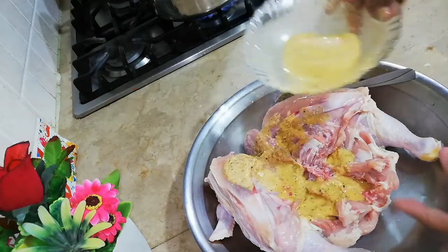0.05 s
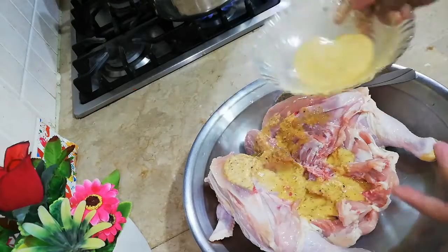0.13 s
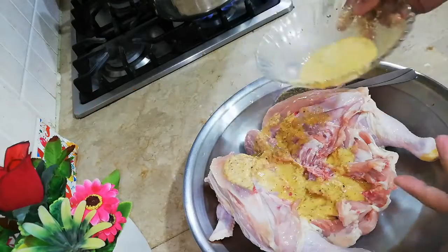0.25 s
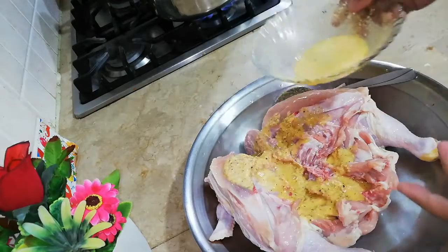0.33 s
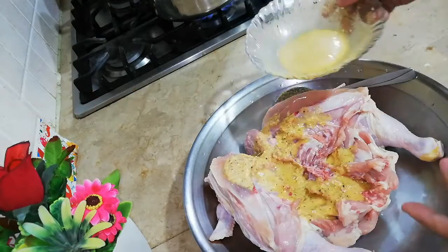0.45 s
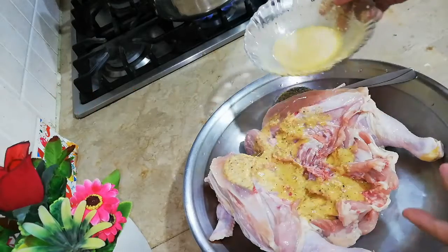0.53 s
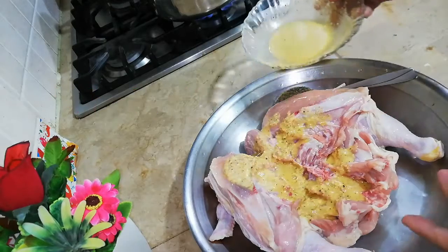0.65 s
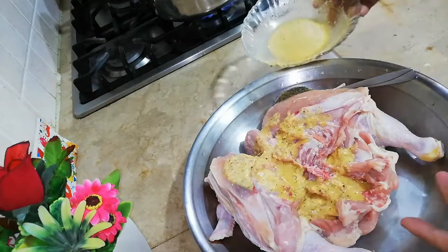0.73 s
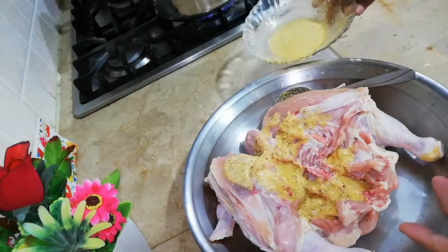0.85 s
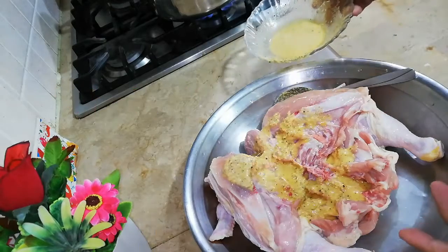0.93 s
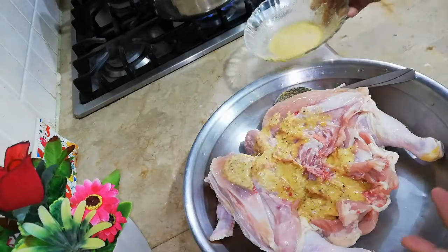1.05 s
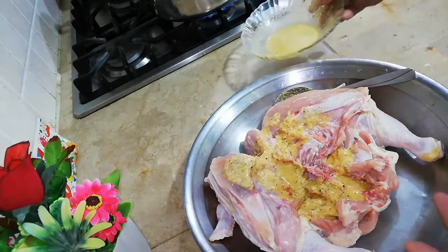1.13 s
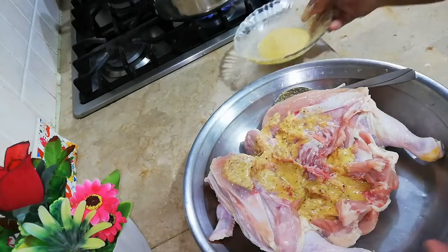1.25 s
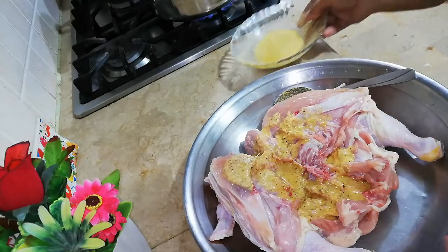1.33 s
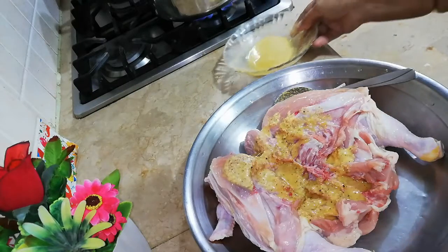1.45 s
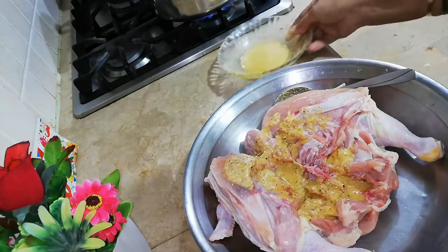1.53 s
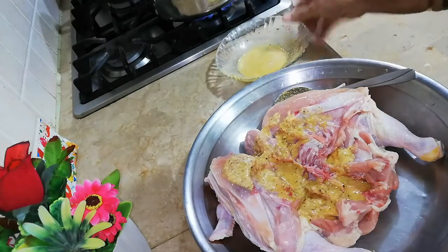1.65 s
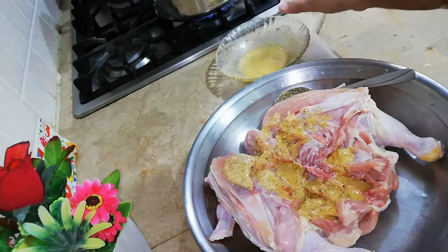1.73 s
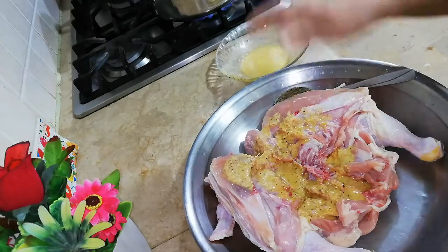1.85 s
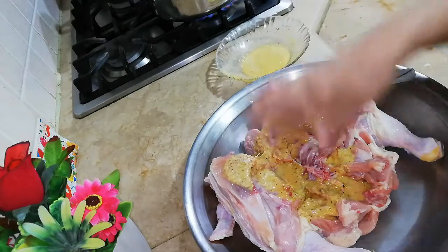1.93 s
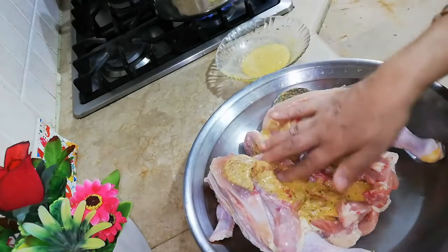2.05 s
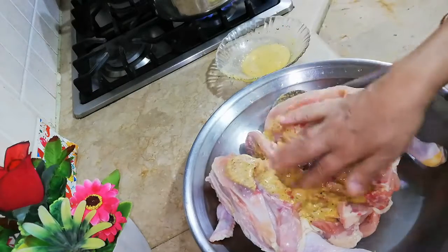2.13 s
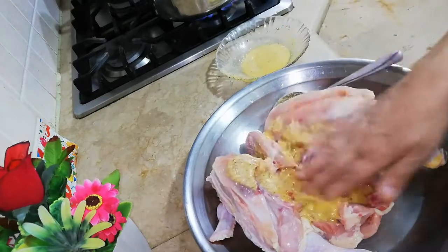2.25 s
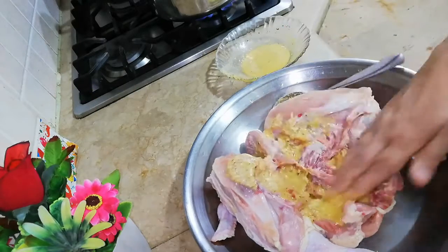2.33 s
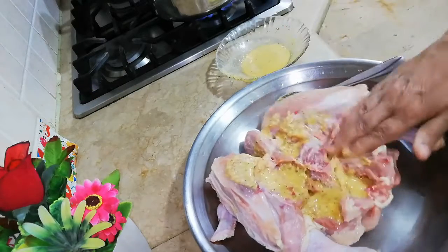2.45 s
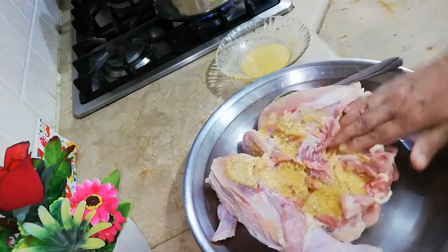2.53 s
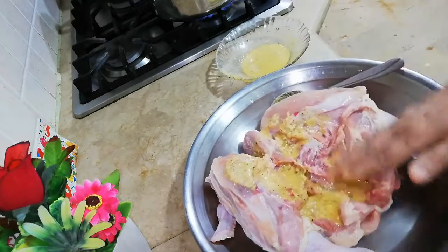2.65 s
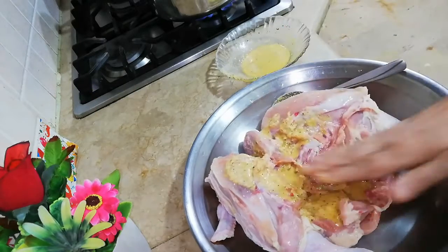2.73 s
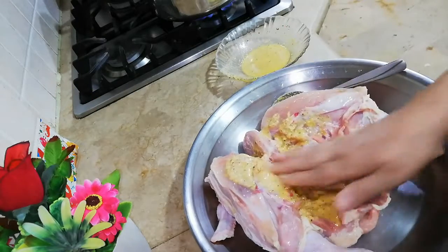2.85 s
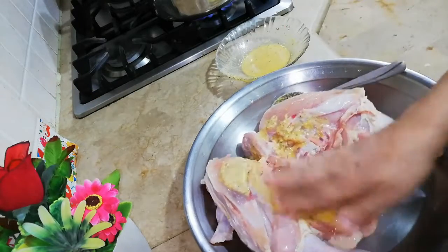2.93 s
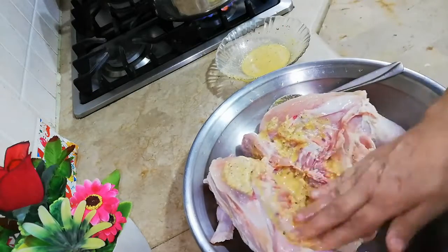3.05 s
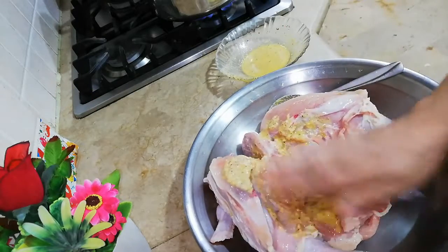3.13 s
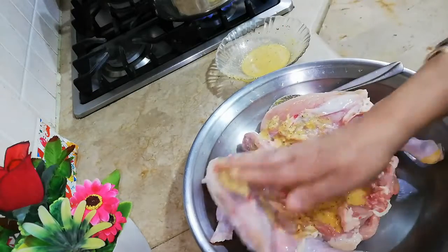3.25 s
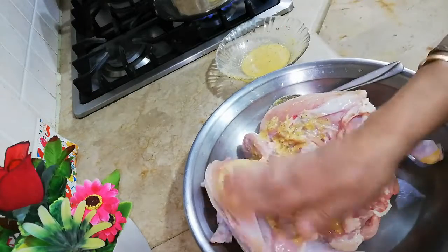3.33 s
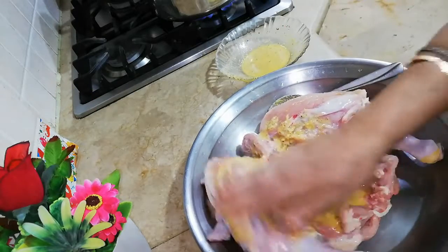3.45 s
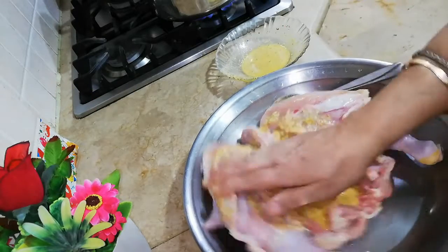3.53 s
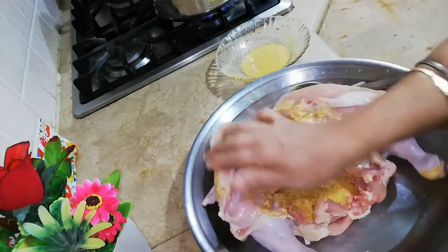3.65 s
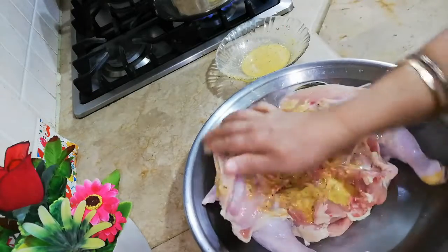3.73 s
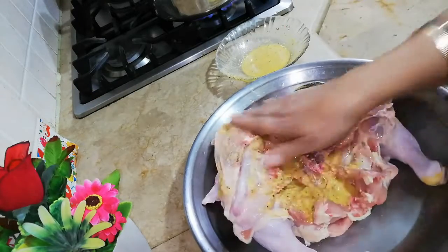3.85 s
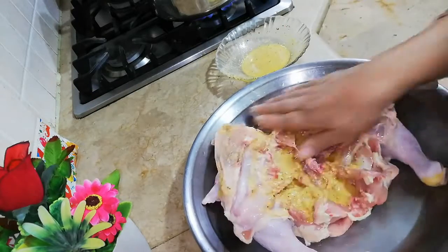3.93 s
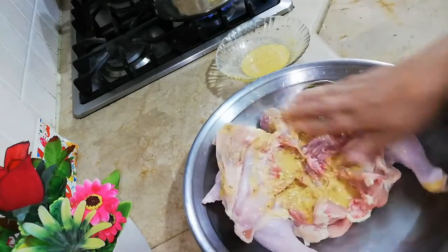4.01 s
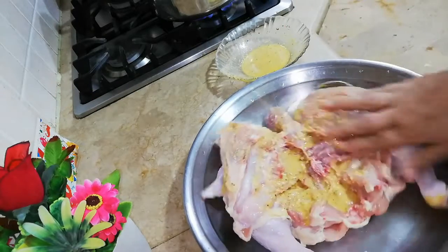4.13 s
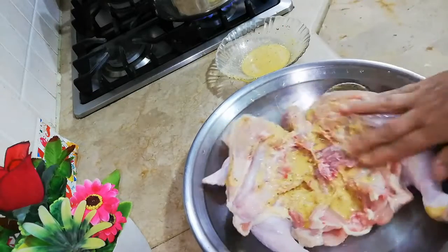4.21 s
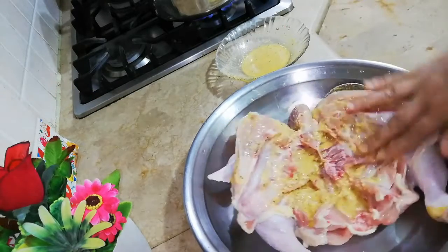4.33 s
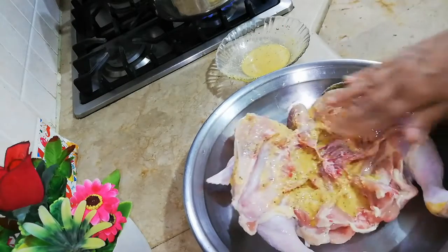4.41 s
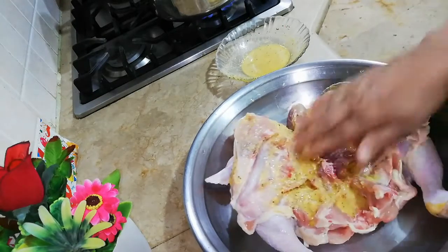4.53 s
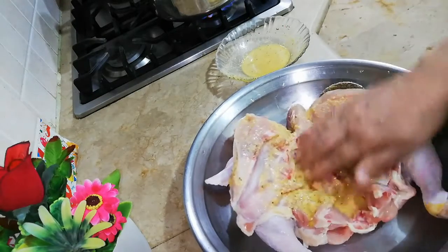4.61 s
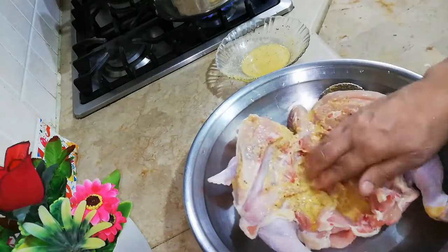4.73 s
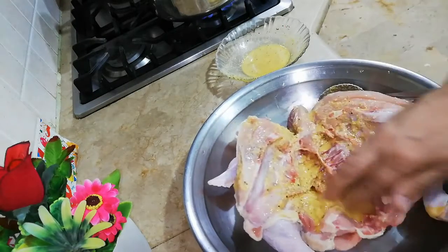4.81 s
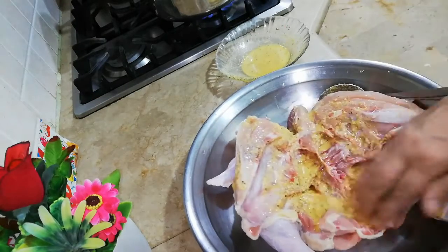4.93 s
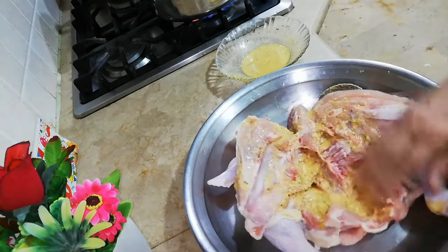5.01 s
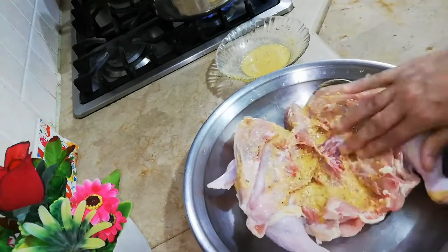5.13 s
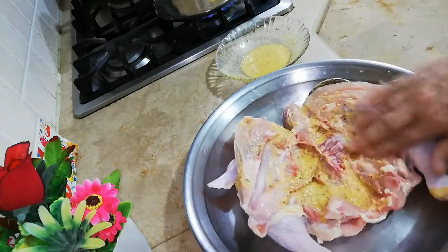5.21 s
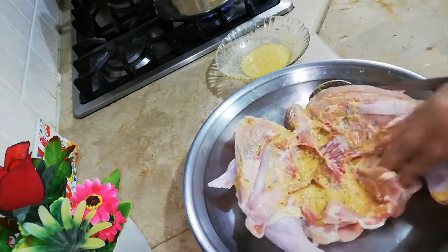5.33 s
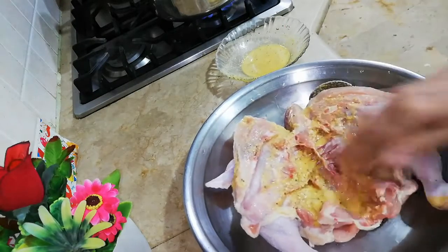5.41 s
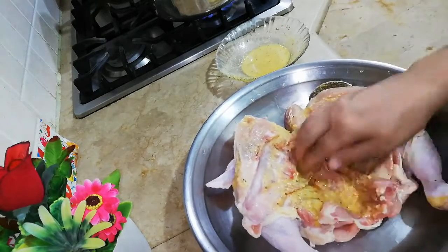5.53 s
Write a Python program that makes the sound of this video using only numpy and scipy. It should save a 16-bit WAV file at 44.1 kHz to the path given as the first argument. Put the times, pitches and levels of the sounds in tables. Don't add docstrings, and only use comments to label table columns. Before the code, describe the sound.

Over a faint fridge hum, glass clunks three times on stone, a spoon clinks, and uneven metallic tray scrapes follow with small wet ticks.

```python
import sys
import numpy as np
from scipy import signal
from scipy.fft import rfft, irfft, next_fast_len
from scipy.io import wavfile
from scipy.ndimage import uniform_filter1d

SR = 44100
rng = np.random.default_rng(int(sys.argv[2]) if len(sys.argv) > 2 else 0)


def attenuation_scalar(level_db):
    decades = np.asarray(level_db, float) / 20
    return 10 ** decades


def inscribe(sig):
    pcm = np.round(np.clip(np.atleast_2d(sig).T, -1, 1) * 32767)
    wavfile.write(sys.argv[1], SR, pcm.astype(np.int16))


N = 245637
T = np.arange(N) / SR

# frequency in Hz, level in dB.
HUM_LINES = [(48.7, -54), (58, -65.5), (99.6, -58.5), (146, -66.5), (289, -69)]
# frequency in Hz, density in dB per Hz.
AIR_SPECTRUM = [(12, -18), (20, -3), (60, -6.5), (168, -7), (234, -18), (293, -16), (642, -27), (1030, -23),
                (1810, -30.5), (1960, -22.5), (2320, -27.5), (3740, -30), (5850, -34), (10800, -33.5),
                (16000, -49.5)]
# frequency in Hz, width in Hz, height above the air in dB.
WHINES = [(304, 10, 4), (1037, 26, 4.5), (1634, 110, 6), (1950, 150, 3.5), (2690, 30, 7.5), (3830, 150, 7),
          (4400, 50, 6), (5700, 190, 3.5), (7050.3, 350, 7), (8880, 508.5, 5), (11000, 220, 8.5),
          (15200, 250, 17)]
# frequency in Hz, t60 in s.
KITCHEN_DECAY = [(100, 0.84), (400, 0.66), (1200, 0.59), (3000, 0.62), (8000, 0.38), (16000, 0.48)]
# start in seconds, peak in dB, centre in Hz, left minus right in dB.
WET_TICKS = [(1.9444, -52, 3880, -7), (2.0639, -46, 5000, -3), (2.6319, -35.5, 2410, 3),
             (2.9986, -29.5, 4930, 7), (3.5224, -46, 4900, 3.5), (3.5513, -32.5, 4150, 2),
             (4.6463, -43, 4830, -4), (4.6604, -53, 3210, 3), (4.7885, -43.5, 5500, -4),
             (5.0809, -43, 4500, 0.0), (5.1064, -30, 4530, 3), (5.3447, -35.5, 3800, -10),
             (3.573, -42, 1300, 0.0)]
# start in seconds, peak in dB, centre in Hz, left minus right in dB.
PASTE_SNAPS = [(2.0526, -42.5, 9000, -3), (2.0797, -36, 8000, 1), (2.5608, -45, 7000, 14.5),
               (2.6005, -45, 10500, 0), (3.292, -41.5, 7100, 2), (4.577, -42, 7500, -2),
               (4.842, -43, 10300, -6), (4.9613, -51.5, 9900, -8), (5.1209, -27, 8700, -13.5)]
# start in seconds, level in dB, pitch in Hz, t60 in s, length in s.
SETTLE_BUMP = (5.485, -56, 630, 0.025, .04)
# start in seconds, peak in dB.
SPOON_CLINKS = [
    (2.197, -49),
    (2.222, -30),
    (2.2227, -25.5),
    (2.2254, -24),
    (2.2265, -31.5),
    (2.2327, -35.5),
    (2.253, -41),
]
# frequency in Hz, level in dB, t60 in s.
SPOON_MODES = [(1524, -26, 0.027), (2280, -9, 0.038), (3200, -3.5, 0.12), (3540, -20, .06),
               (4260, 0.5, 0.044), (5060, -10, .08), (6970, -8, 0.042), (7500, -12, 0.031),
               (8000, -4, 0.036), (9170, -15, 0.047), (10000, -30, 0.054), (11870, -16, .04)]
# start in seconds, peak in dB, crack in dB, chip pitch in Hz, rim level in dB.
BOWL_KNOCKS = [
    (1.459, -7, -18.5, 5350, -35),
    (1.53, -8.5, -19.5, 5100, -37),
    (1.625, -10.5, -15.5, 4460, -15),
]
# frequency in Hz, level in dB, t60 in s.
BOWL_MODES = [(117, -2, 0.11), (173.6, 5.5, 0.22), (326, 0, 0.081), (850, -7, 0.026), (1240, 5, 0.03),
              (1366, -5, 0.014), (1510, 10.5, 0.017), (1642.7, -9, 0.017), (2030, -2, .012),
              (2416, 3, 0.027), (2434.3, 2.5, 0.014), (3070, -8, 0.0164)]
# frequency in Hz, density in dB per Hz.
CLATTER_SPECTRUM = [(59, -33), (100, -3.5), (360, -7.5), (523, -12), (1500, 3), (2320, -7), (4050, -22),
                    (5190, -26.5), (9850, -24), (14000, -39)]
# frequency in Hz, width in Hz, level in dB.
TRAY_MODES = [(1120, 59, -11), (1254, 52, 10), (1376.5, 32, 11), (1552, 27, 3.5), (1700, 27, -8),
              (1800, 67, 11), (1906, 51, 9.5), (2140, 31, 4.5), (2410, 44.76, 2), (3177, 46, 2),
              (3390, 40, -1.5), (3580, 33, -2), (3756, 56, -3), (4010, 53, -5), (4310, 30, -2),
              (4520, 60, -2), (4798, 57, -1.5), (4990, 33, -1), (5800, 360, -7), (6400, 180, -4),
              (7270, 230, -3), (6900, 1000, 4), (8160, 160, 4), (8800, 180, -0.5), (9400, 68, 2),
              (10530, 100, 11.5), (11000, 280, -17)]
# frequency in Hz, t60 in s.
TRAY_DRONE = (870, 0.06)
# frequency in Hz, density in dB per Hz.
SCRAPE_SPECTRUM = [(180, -44), (300, 11), (713, -2), (870, -4), (1060, -33), (1260, 10), (1660, 11.5),
                   (1870, -8), (2610, -5), (3130, -15), (4590, -5.5), (6000, -7), (8000, 3), (11100, -2.5),
                   (16000, -20)]
# frequency in Hz, width in Hz, depth in dB.
TRAY_GAPS = [(1120, 160, -2), (2870, 200, -5.5), (5450, 300, -7), (5950, 300, -4), (10448, 680, -10)]
# peak time in seconds, scrape in dB, rise over 20 dB in s, fall over 20 dB in s,
# weight on the tray in dB.
HAND_SLIPS = [(2.231, -37.5, .006, .09, -8.5), (2.4, -43, 0.25, 0.1, -6), (2.532, -44, 0.05, 0.08, -3),
              (2.682, -44.5, -0.07, 0.08, -1), (2.726, -42.5, 0.21, 0.03, -5), (2.978, -50, .035, 0.05, -4),
              (3.006, -44.5, .05, 0.12, -11), (3.076, -41.5, 0.03, .05, -5.5),
              (3.576, -45, -0.08, 0.06, -3), (3.635, -36, 0.09, 0.19, -8), (3.75, -40, 0.21, 0.04, -5.5),
              (3.998, -45, 0.04, .5, -5.5), (4.15, -41, .1, 0.26, -4.5),
              (4.295, -38.5, -0.01, 0.0672, -3.5), (4.332, -35.5, 0.036, .035, -10),
              (4.382, -35, .028, 0.1335, -3), (4.426, -41, 0.19, 0, -6), (4.488, -61, 7, 0.35, -18.5),
              (5.084, -42.5, 0.0429, 0.27, -5), (5.128, -46, 0.08, 0.19, -2.5), (5.262, -43, 0.16, .06, -2),
              (5.346, -47, .025, 0.04, -5), (5.385, -41.5, 0.02, 0.18, -2.5), (5.455, -46, 0.13, 0.06, -3)]
# peak time in seconds, scrape in dB, weight on the tray in dB.
HAND_NUDGES = [
    (1.955, -60, -5),
    (2.074, -57, -8),
    (2.15, -65, 1),
    (2.885, -67, 5.5),
    (3.42, -51, -2.5),
    (4.687, -56, 3),
    (4.788, -58.5, -5),
]
# time in seconds, favoured low pitch in Hz, favoured high pitch in Hz,
# gloss of the slide in dB, grip on the rim in dB.
TRAY_CONTACT = [(1.95, 1800, 3900, -3.5, 8), (2.27, 1410, 4070, -8.5, -4), (2.42, 1870, 4270, -6, -5),
                (2.53, 1320, 4050, -7, -2), (2.74, 1825, 4000, -10.5, -7), (2.97, 1400, 4600, -1.5, 0),
                (3.09, 1800, 4000, -4, -7), (3.42, 1860, 3700, -8, 0), (3.56, 1400, 4400, 0, -5.5),
                (3.64, 1650, 4500, 1, -2.5), (3.79, 1740, 4540, -1.5, 2), (4.0, 1860, 4500, -5, -1),
                (4.11, 1870, 4000, -4.5, 5), (4.3, 1624, 4150, 0, -5.5), (4.39, 1410, 3900, -3, -2.5),
                (4.7, 1420, 3960, -6, 0), (5.1, 1486, 4100, -3, -5.5), (5.45, 1340, 3820, -8, 2.5)]

PORTS_M = 0.31
AIR_DB = -58.5
TICK_OCTAVES, TICK_T60_S = 0.55, 0.011
SNAP_OCTAVES, SNAP_T60_S = 0.57, 0.02
THUD_DB = -11.5
NUDGE_RISE_S, NUDGE_FALL_S = .06, 0.055
ROUNDNESS = 1.436
LOW_SPLIT_HZ, HIGH_SPLIT_HZ, LEAN_DB_PER_OCTAVE = 1530, 4270, 14.5
DRONE_LINGER, BOOM_LINGER, SCRAPE_LINGER, HISS_LINGER = 1.08, 1.006, 0.9, .85
DRONE_DB, CROWD_DB, TRAY_DB, PAN_DB = -13.5, -4.5, 3.0, -1.0
PATCHY_DB, PATCHES_PER_S = 1.5, 30
TOP_HZ = 16150


def colour(table, hz):
    rows = np.array(table)
    return np.interp(np.log(hz + 1), np.log(rows[:, 0]), rows[:, 1])


def bumps(table, hz):
    return sum(db / (1 + (2 * (hz - f) / w) ** 2) for f, w, db in table)


def shape(x, gain):
    size = next_fast_len(x.shape[-1])
    return irfft(rfft(x, size) * gain(np.fft.rfftfreq(size, 1 / SR)), size)[..., :x.shape[-1]]


def unit(x):
    return x / np.sqrt(np.mean(x ** 2))


def even(x, span_s=0.03):
    return x / np.sqrt(uniform_filter1d(np.mean(x ** 2, 0), int(span_s * SR)))


def pan(db):
    return attenuation_scalar(np.array([db, -db]) / 2)


def walk(rate_hz):
    k = int(SR / rate_hz)
    knots = N // k + 2
    return 1.26 * np.interp(T, np.arange(knots) * k / SR, rng.standard_normal(knots))


def diffuse(size):
    mid, side = rng.standard_normal((2, size))
    alike = lambda hz: np.sinc(2 * hz * PORTS_M / 343)
    side = shape(side, lambda hz: np.sqrt((1 - alike(hz)) / (1 + alike(hz))))
    return np.array([mid + side, mid - side])


def ring(x, hz, t60_s, turn_rad):
    pole = np.exp((2j * np.pi * hz - np.log(1000) / max(t60_s, .002)) / SR)
    z = signal.lfilter([1], [1, -pole], x)
    return np.array([z.imag, (z * np.exp(1j * turn_rad)).imag])


def tail(t60, length_s):
    noise = diffuse(int(length_s * SR))
    t = np.arange(noise.shape[1]) / SR
    out = 0
    for f in 60 * 2 ** np.arange(0, 8.5, .5):
        band = shape(noise, lambda hz: np.clip(1 - 2 * abs(np.log2((hz + 1) / f)), 0, 1))
        out = out + band * attenuation_scalar(-60 * t / t60(f))
    return out / np.sqrt(np.sum(out ** 2) / 2)


def through(x, response):
    return signal.fftconvolve(x[None], response, axes=1)[:, :N]


def place(out, start_s, sound):
    k, out = int(start_s * SR), out.copy()
    out[:, k:k + sound.shape[1]] += sound[:, :N - k]
    return out


def fridge():
    hum = 0
    for line_hz, db in HUM_LINES:
        phase = 2 * np.pi * np.cumsum(line_hz + 0.17 * walk(3.08)) / SR
        hum = hum + np.sqrt(2) * attenuation_scalar(db + 2.0 * walk(6.8)) * np.sin(phase)
    spectrum = lambda hz: attenuation_scalar(colour(AIR_SPECTRUM, hz) + bumps(WHINES, hz)) * hz ** 2 / (hz ** 2 + 53.55 ** 2)
    air = shape(diffuse(N), spectrum)
    level = np.std(shape(air.mean(0), lambda hz: hz > 400))
    return hum + air * attenuation_scalar(AIR_DB) / level


def ticks():
    out, t = np.zeros((2, N)), np.arange(int(.06 * SR)) / SR
    kinds = ((WET_TICKS, TICK_OCTAVES, TICK_T60_S), (PASTE_SNAPS, SNAP_OCTAVES, SNAP_T60_S))
    for rows, octaves, t60_s in kinds:
        for s, db, centre_hz, pan_db in rows:
            band = lambda hz: np.exp(-(np.log2((hz + 1) / centre_hz) / octaves) ** 2)
            snap = shape(rng.standard_normal((2, len(t))), band) * attenuation_scalar(-60 * t / max(t60_s, .002))
            out = place(out, s, attenuation_scalar(db + 8.0) * snap / abs(snap).max() * pan(pan_db)[:, None])
    return out


def settling():
    s, db, hz, t60_s, length_s = SETTLE_BUMP
    swell = np.exp(-((T - s - length_s) / length_s) ** 2)
    return attenuation_scalar(db) * even(ring(rng.standard_normal(N), hz, t60_s, 0.55)) * swell


def spoon():
    blows = np.zeros(N)
    for s, db in SPOON_CLINKS:
        blows[int(s * SR)] = attenuation_scalar(db)
    modes = 0
    for hz, db, t60_s in SPOON_MODES:
        modes = modes + attenuation_scalar(db + 7.5) * ring(blows, hz, min(t60_s, .1), rng.uniform(-np.pi, np.pi))
    spray = through(blows, tail(lambda hz: .1, 0.2))
    rim = shape(spray, lambda hz: attenuation_scalar(colour(SCRAPE_SPECTRUM, hz)) * hz ** 2 / (hz ** 2 + 710.0 ** 2))
    return modes + attenuation_scalar(20.5) * rim


def bowl():
    out, sent = np.zeros((2, N)), np.zeros((1, N))
    t = np.arange(int(.3 * SR)) / SR
    lag_s = 0.000803
    click = 1. * (np.arange(len(t)) == SR // 10)
    pushes = ((.0001, 0.411), (.0011, 1.), (.0034, .4))  # (s, size)
    push = sum(size * np.exp(-((t - at) / .00008) ** 2) for at, size in pushes)
    for s, db, crack_db, chip_hz, rim_db in BOWL_KNOCKS:
        body = 0
        for hz, mode_db, t60_s in BOWL_MODES:
            share_db = mode_db + 2.0 * rng.standard_normal() + THUD_DB * (hz < 500)
            turn_rad = 2 * np.pi * hz * lag_s * min(hz / 980.0, 1)
            mode_hz = hz * (1 + 0.042 * rng.standard_normal())
            body = body + attenuation_scalar(share_db) * ring(rng.choice((-1, 1)) * push, mode_hz, t60_s, turn_rad)
        out = place(out, s, attenuation_scalar(db) * body / abs(body.mean(0)).max())

        crack = rng.standard_normal(len(t)) * np.exp(-abs(t - .001) / 0.00049)
        chip = ring(crack, chip_hz, 0.015, 1.74)
        out = place(out, s, attenuation_scalar(db + crack_db + 4.0) * chip / abs(chip).max())

        grains = shape(diffuse(len(t)), lambda hz: hz / (hz + 2400.0) / (1 + (hz / 7800.0) ** 2))
        out = place(out, s, attenuation_scalar(db + crack_db + 6) * grains * np.exp(-t / 0.0033))

        rim = [(8350, 900, rim_db + 24), (chip_hz, 500, 6), (170, 30, 6), (345, 40, 6)]
        clatter = shape(click, lambda hz: attenuation_scalar(colour(CLATTER_SPECTRUM, hz) + bumps(rim, hz)))
        sent = place(sent, s - .099, attenuation_scalar(db) * clatter[None])
    return shape(out, lambda hz: 1 - 1 / (1 + (hz / 180.0) ** 6)), sent[0]


def slips(weight, linger):
    nudges = [(s, db, NUDGE_RISE_S, NUDGE_FALL_S, low_db) for s, db, low_db in HAND_NUDGES]
    power = np.full(N, 1e-18)
    for s, db, rise_s, fall_s, low_db in list(HAND_SLIPS) + nudges:
        near = slice(int((s - .5) * SR), int((s + 1) * SR))
        t = T[near]
        away = np.where(t < s, (s - t) / max(rise_s, .005), (t - s) / max(fall_s, .005)) / linger
        power[near] += attenuation_scalar(db + weight * low_db - 20 * away ** ROUNDNESS) ** 2
    return np.sqrt(power)


def patchy():
    return attenuation_scalar(PATCHY_DB * walk(PATCHES_PER_S))


def tray_body(grit, boom_hz, scrape_hz):
    modes = 0
    for hz, width_hz, db in TRAY_MODES:
        off = np.log2(hz / boom_hz) / .16 if hz < 2800 else np.log2(hz / scrape_hz) / .45
        favour_db = (16 * np.exp(-off ** 2) - 8) * (hz < 5400)
        feed = attenuation_scalar(db + 4 * walk(11) + favour_db)
        turn_rad = rng.uniform(-np.pi, np.pi)
        modes = modes + np.sqrt(width_hz) * ring(feed * grit, hz, 2.02 / width_hz, turn_rad)
    crowd = sum(attenuation_scalar(2.3 * walk(8.2)) * through(grit, tail(lambda hz: .08, .12)) for _ in range(3))
    crowd = shape(crowd, lambda hz: attenuation_scalar(colour(SCRAPE_SPECTRUM, hz) - 3.1 * (hz < 2800)))
    body = unit(modes) + attenuation_scalar(CROWD_DB) * unit(crowd)
    return shape(body, lambda hz: attenuation_scalar(bumps(TRAY_GAPS, hz)))


def tray():
    rows = np.array(TRAY_CONTACT)
    boom_hz, scrape_hz, gloss_db, grip_db = (np.interp(T, rows[:, 0], c) for c in rows.T[1:])
    grain_db = 2.2 * rng.exponential(size=N) + 2.3 * walk(150) + 0.75 * walk(40)
    grit = unit(rng.standard_normal(N) * attenuation_scalar(grain_db))
    body = tray_body(grit, boom_hz, scrape_hz)

    edges_hz = (1020, LOW_SPLIT_HZ, 2600, HIGH_SPLIT_HZ, 5700)
    under = [shape(body, lambda hz: 1 / (1 + (hz / edge) ** 16)) for edge in edges_hz]

    def lean(k, hz, split_hz):
        upper_gain = attenuation_scalar(LEAN_DB_PER_OCTAVE * np.log2(hz / split_hz))
        return even((under[k] - under[k - 1]) + (under[k + 1] - under[k]) * upper_gain)

    lowest = even(ring(grit, *TRAY_DRONE, 1.82)) + attenuation_scalar(-2.5) * even(under[0])
    drone = lowest * attenuation_scalar(DRONE_DB + grip_db) * slips(0.9, DRONE_LINGER)
    boom = lean(1, boom_hz, LOW_SPLIT_HZ) * slips(1, BOOM_LINGER) * patchy()
    scrape = lean(3, scrape_hz, HIGH_SPLIT_HZ) * slips(0, SCRAPE_LINGER) * patchy()
    hiss = even(body - under[4]) * attenuation_scalar(gloss_db) * slips(0, HISS_LINGER) * patchy()
    return (drone + boom + scrape + hiss) * attenuation_scalar(TRAY_DB) * pan(PAN_DB)[:, None]


def scene():
    room = np.pad(tail(lambda hz: colour(KITCHEN_DECAY, hz), 0.94), ((0, 0), (int(.006 * SR), 0)))
    counter = np.pad(tail(lambda hz: .09, 0.18), ((0, 0), (int(.003 * SR), 0)))
    knocks, clatter = bowl()
    hand = tray() + spoon() + ticks() + settling()
    echoes = through(attenuation_scalar(24.5) * clatter + attenuation_scalar(-14.5) * hand[0], room)
    echoes = echoes + attenuation_scalar(19.0) * through(clatter, counter)
    return knocks + hand + echoes + fridge()


def top_cut(x):
    return signal.sosfilt(signal.butter(12, 16490, fs=SR, output="sos"), x)


def record(dry):
    mix = shape(dry, lambda hz: np.clip((TOP_HZ - hz) / 300, 0, 1))
    return top_cut(mix)


dry = scene()
out = record(dry)
inscribe(out)
```